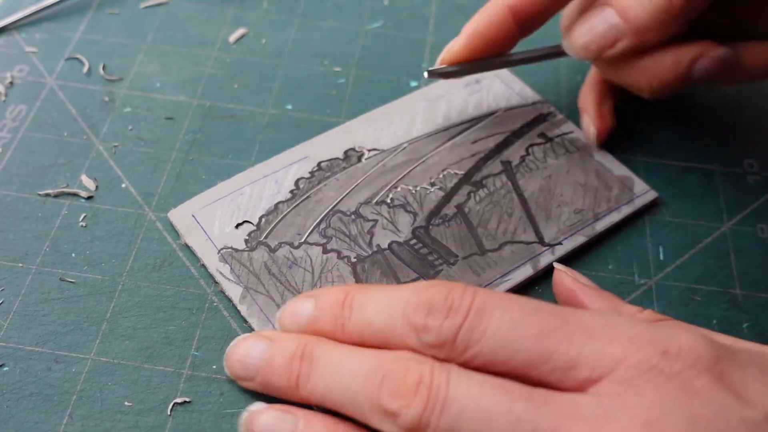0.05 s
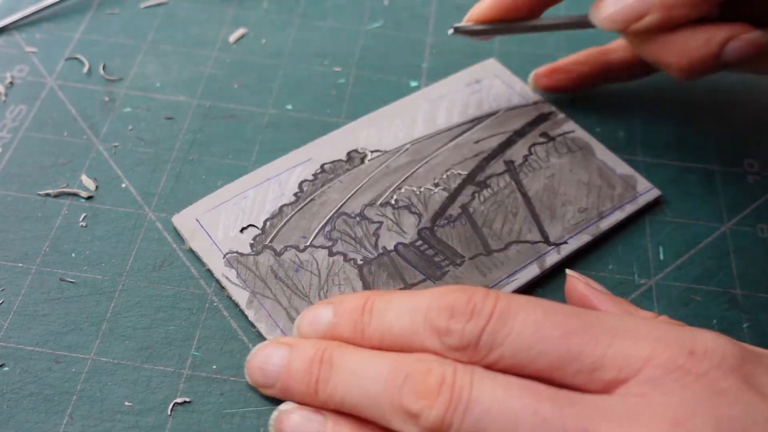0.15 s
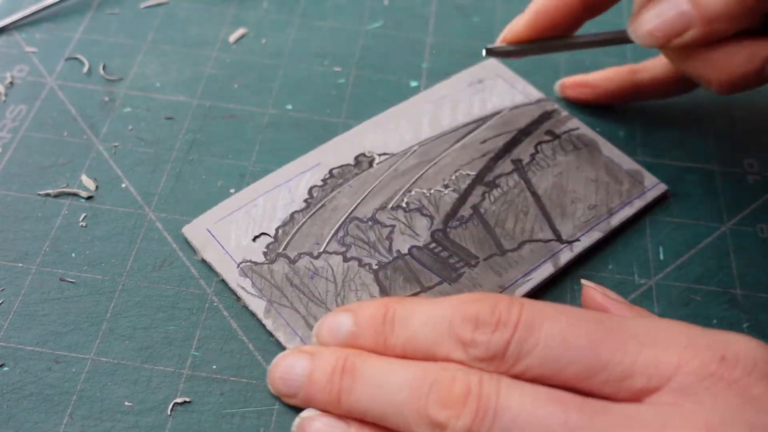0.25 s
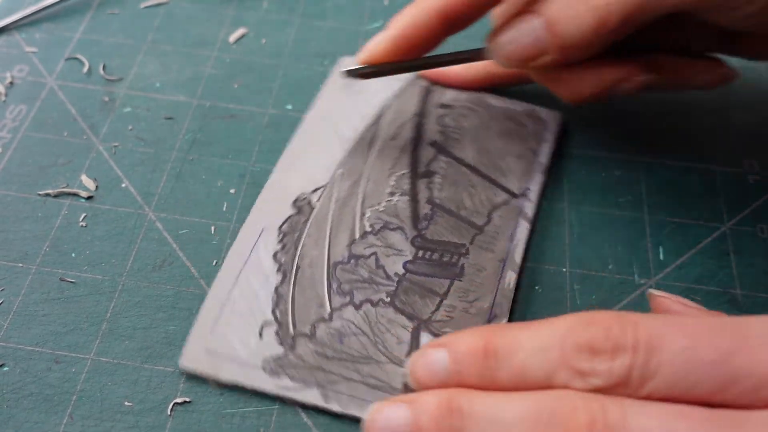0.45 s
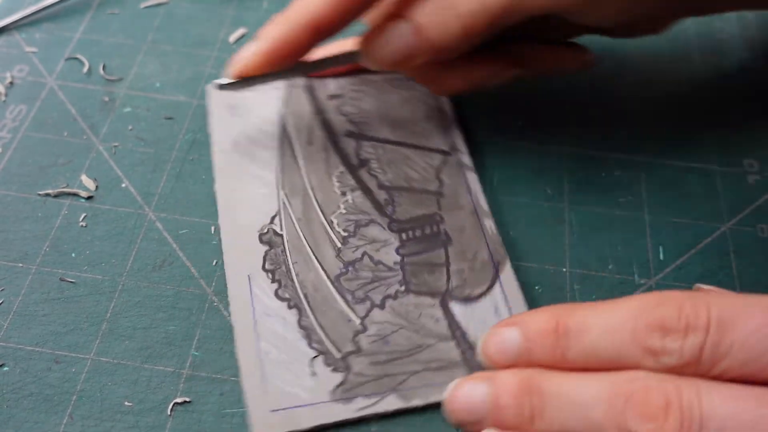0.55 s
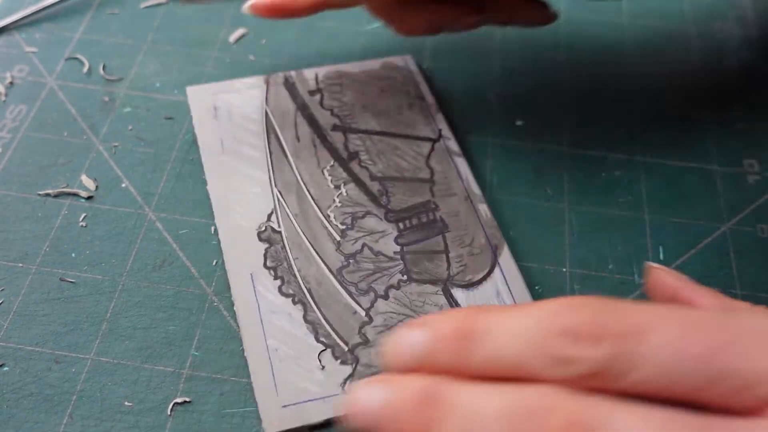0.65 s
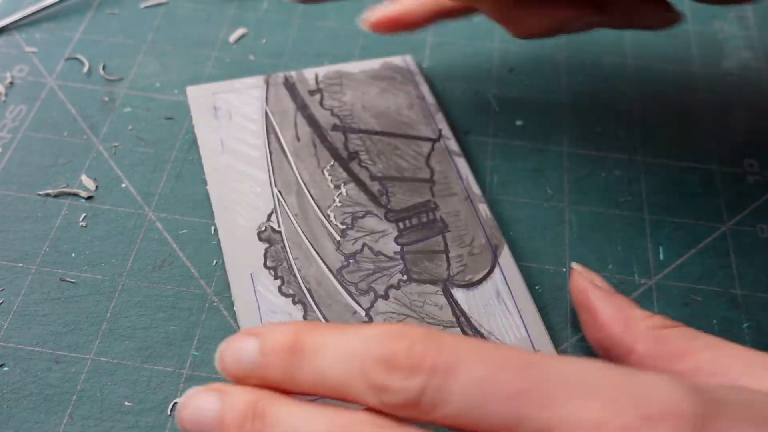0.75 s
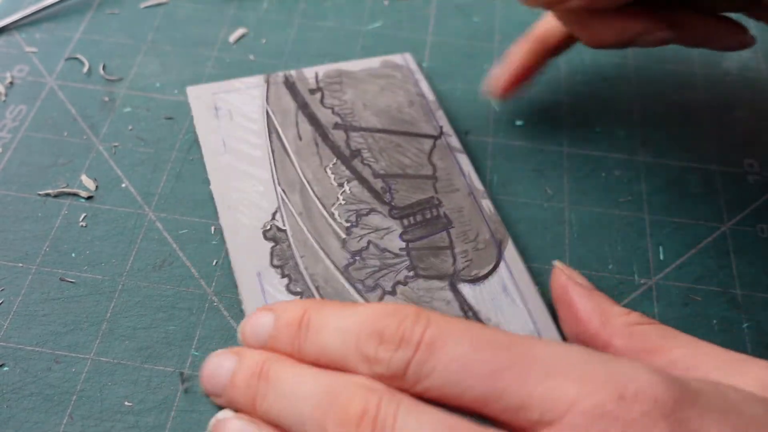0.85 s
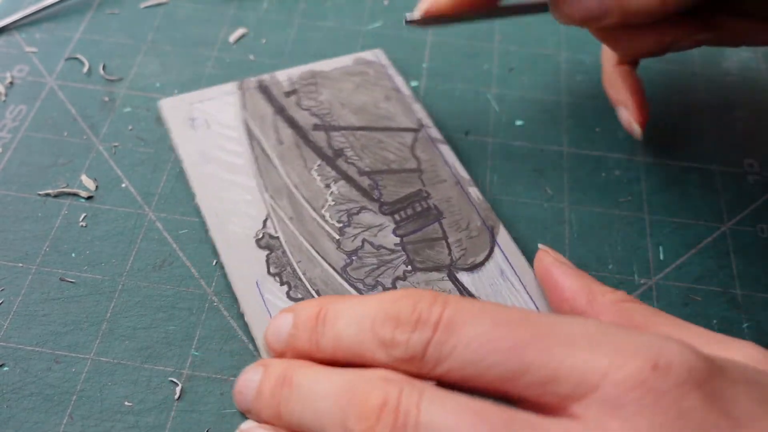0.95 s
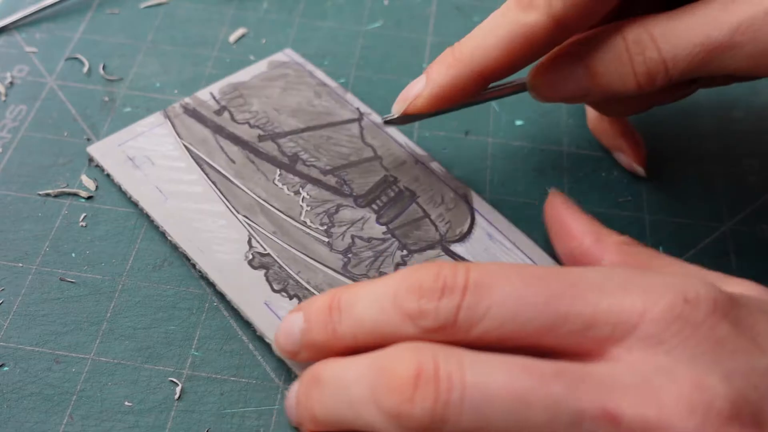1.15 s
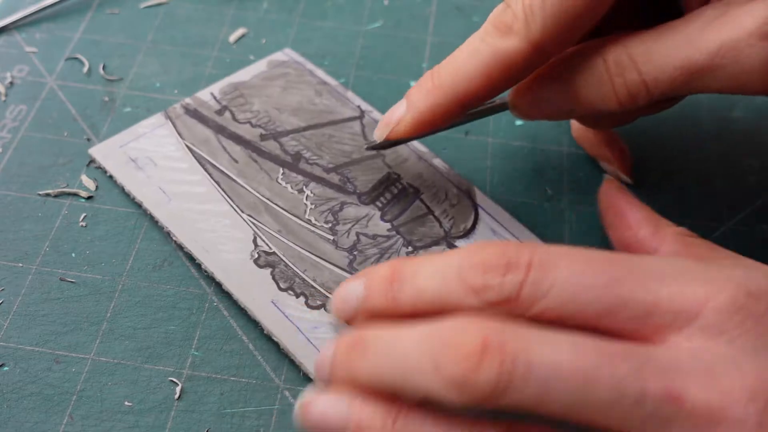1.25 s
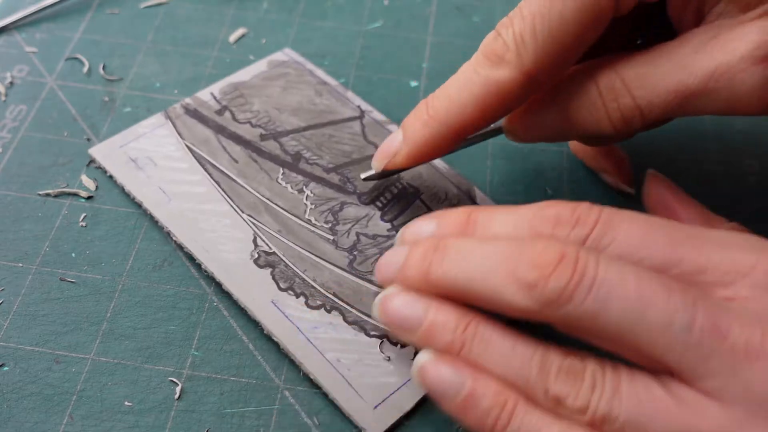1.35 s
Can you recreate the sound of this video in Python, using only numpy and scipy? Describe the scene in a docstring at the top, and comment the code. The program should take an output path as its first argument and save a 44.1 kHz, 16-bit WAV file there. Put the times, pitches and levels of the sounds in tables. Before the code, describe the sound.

A small carving block scrapes on a cutting mat, hollow and hissy. In the first 0.3 seconds a hand tool ticks lightly among short nudges. One longer scrape then swells, peaks with a soft knock near 0.55 seconds and fades by 0.8. More short rubs follow from 0.85 seconds, and the block settles with a few quick soft knocks around 1.2 seconds, over a faint room hush.

```python
"""Over the faint hush of a small room, a hand tool ticks lightly against a small carving block.
A hand turns the block on a cutting mat: short nudges, one long swelling scrape, then a few more nudges.
The rubbing is a stream of tiny slips that make the block ring hollowly and the mat hiss, with brief zips.
The block knocks softly at the height of the scrape, and a few more times as it is set in place."""
import sys
import numpy as np
from scipy import signal
from scipy.fft import rfft, irfft, next_fast_len
from scipy.io import wavfile

SR = 44100
rng = np.random.default_rng(int(sys.argv[2]) if len(sys.argv) > 2 else 0)


def dump(signal):
    """Clip the signal to [-1, 1] and save it as 16-bit WAV at the path in sys.argv[1]."""
    limited = np.clip(np.atleast_2d(signal).T, -1, 1)
    pcm = np.round(limited * 32767).astype(np.int16)
    wavfile.write(sys.argv[1], SR, pcm)


N = 61739

# A colour says how strong each frequency is next to the others.
# colour of the room's hush: f/Hz, level/dB
HUSH_COLOUR = [(25, -40), (60, -20), (130, -14), (260, -5), (500, -1), (700, 0.5), (880, 5.5), (1200, -1),
               (1550, 4), (2100, 3.5), (3200, -0.5), (6000, -2.5), (10000, -7), (15500, -8)]
# sharp ticks of tool and block edge: t/s, level/dB, treble tilt/(dB per octave)
TICK_HITS = [(.0073, -50.5, 5.5), (0.0397, -32, -1), (0.221, -42, 14), (0.2216, -34, -3),
             (0.2622, -41.5, -4), (0.2755, -46, -7), (0.349, -42, -2.5), (0.5654, -36, -3.5)]
# colour of a tick: f/Hz, level/dB
TICK_COLOUR = [(40, -32), (200, -27.5), (500, -10.5), (750, -27.5), (1180, 2), (1400, -13), (1900, 1),
               (2600, -4), (3200, -12), (4000, -3.5), (5100, -4.5), (6800, -12.5), (10800, -11),
               (12800, -25), (14500, -16), (15800, -32)]
# short pushes: peak t/s, rise/s, fall/s, ring f/Hz, then level/dB of hollow ring, upper ring, rasp, hiss
SHORT_NUDGES = [(.132, 0.028, 0.038, 1160, -71.5, -67.5, -67.5, -61.5),
                (.162, 0.015, 0.066, 1210, -74, -70, -65.5, -61.5),
                (.21, 0.032, 0.12, 1247, -61.5, -62.5, -60, -62),
                (0.265, 0.0097, 0.035, 1280, -55.5, -52.5, -54.5, -64.5),
                (.855, 0.027, 0.066, 1340, -63, -72.5, -67, -67.5),
                (0.919, 0.03, 0.038, 1206, -56, -63.5, -59.5, -63),
                (1.04, 0.1, 0.12, 1226, -59.5, -63.5, -59, -59.5),
                (1.129, 0.005, 0.046, 1220, -58, -80, -65, -67.5),
                (1.204, 0.068, 0.036, 1150, -56, -69, -63, -69),
                (1.233, 0.043, 0.019, 1240, -55, -67, -60.5, -68.5),
                (1.27, 0.047, 0.055, 1050, -69, -72, -73.5, -75.5)]
# the long turn: t/s, then level/dB of hollow ring, upper ring, rasp, hiss
LONG_TURN = [(0.3, -60, -64, -66.5, -69), (0.334, -55, -61.5, -61.5, -63.5),
             (0.344, -53, -58.5, -52.5, -61), (0.388, -51, -58, -54.5, -55.5),
             (0.483, -49.5, -49, -46.5, -46.5), (0.557, -47, -49, -47.5, -44.5),
             (0.564, -47, -48.5, -45, -45.5), (0.61, -53, -50.5, -50.5, -49),
             (0.638, -51.5, -55.5, -56.5, -57), (0.684, -71.5, -64, -66.5, -69.5),
             (0.752, -73, -71.5, -75, -78.5), (0.812, -75.5, -75, -78.5, -86), (0.83, -88, -73.5, -84, -90)]
# colours of those four parts of the rubbing: f/Hz, level/dB
HOLLOW_COLOUR = [(30, -72), (120, -57), (260, -38.5), (500, -24.5), (680, -31), (830, -23), (950, -15),
                 (1120, -5), (1220, 1.5), (1340, -5), (1480, -8.5), (1650, -12.5), (1900, -32), (4000, -46)]
UPPER_COLOUR = [(300, -71), (520, -24.5), (750, -26.5), (1350, -18.5), (1640, -1.5), (1780, -5.5),
                (1950, -0.5), (2150, -4.5), (2500, -17.5), (5000, -32.5)]
RASP_COLOUR = [(300, -61), (1500, -30), (2150, -11.5), (2400, 0), (2660, 0), (3000, -0.5), (3400, -4),
               (3780, -1.5), (4150, -5), (4500, -7), (5000, -8), (6200, -22.5), (15000, -41)]
HISS_COLOUR = [(1000, -49), (3500, -19), (5300, -2), (6300, 0), (7000, -1), (7800, -0.5), (9200, -2.5),
               (10400, -3), (12500, -5.5), (15500, -7.5)]
# the block's narrow resonances, which shape all rubbing: f/Hz, width/Hz, boost/dB
BLOCK_RESONANCES = [(823, 14, 5), (1234, 23, 2.5), (1654, 30, 1), (1925, 32, 1), (2330, 31, 2),
                    (2400, 13, 4.5), (2560, 52, 3.5), (2665, 76, 3), (3840, 220, -1), (4370, 230, 2)]
# stereo width of the rubbing: f/Hz, side level/dB compared with the middle
RUB_WIDTH = [(60, -20), (250, -12), (600, -2.5), (1200, -14.5), (2500, -11.5), (5000, -13), (14000, -11)]
# low drag on the mat, strongest as the turn slows: t/s, level/dB
MAT_DRAG = [(.2, -87), (.265, -72), (.38, -71.5), (.5, -73), (.575, -58), (.63, -63.5), (.7, -75),
            (.78, -77.5), (.86, -100)]
# colour of that drag: f/Hz, level/dB
MAT_COLOUR = [(60, -44), (160, -20.5), (270, -9), (400, -25), (500, -5.5), (700, -0.5), (850, 8.5),
              (1000, -5), (1400, -24), (5000, -53)]
# brief resonances in the hiss: peak t/s, half length/s, f/Hz, half width/Hz, level/dB
HISS_ZIPS = [(0.157, .022, 10250, 600, -64.5), (0.155, 0.015, 6100, 450, -77),
             (.2153, .0022, 4430, 2200, -52), (0.358, 0.1, 7940, 700, -67), (0.408, 0.12, 3820, 400, -62),
             (.46, 0.07, 7750, 700, -62.5), (0.564, 0.084, 6400, 1200, -52.5),
             (0.568, 0.017, 3760, 705, -47), (0.895, .06, 7700, 1000, -73.5),
             (1.026, 0.043, 9300, 805, -65.5), (1.03, 0.13, 4730, 704, -67), (1.102, 0.1, 8550, 790, -72)]
# soft knocks: peak t/s, level/dB, f/Hz, contact/s, overtone boost/dB,
# then the thud's level/dB, f/Hz and time to fade by 60 dB/s
BLOCK_KNOCKS = [(0.567, -34, 1220, 0.003, -12, -46, 560, .045),
                (1.2095, -51, 1400, 0.0018, 5, -80, 300, .01),
                (1.2155, -34, 1160, 0.0016, -11, -53.5, 290, .02),
                (1.228, -47, 1300, 0.0013, 1, -80, 300, .01), (1.2316, -44, 1150, 0.001, 7, -74, 300, .01),
                (1.2367, -35.8, 1160, 0.0023, -10, -66, 270, .07),
                (1.24, -44, 1350, 0.0011, 1, -78, 340, .01), (1.2445, -46, 1170, 0.0015, -4, -80, 340, .01)]
# overtones of the knocked block: f/Hz, relative level/dB
BLOCK_OVERTONES = [(1150, -9), (1550, -5), (2130, -11.5), (2480, -12), (3220, -15.5), (3680, -15.5)]
# where the block and tool are heard: t/s, left minus right level/dB
BALANCE = [(.1, -1), (.4, -0.8), (.6, 0.2), (.8, -4), (.95, 1.4), (1.3, 1)]
# the room's echo: f/Hz, time to fade by 60 dB/s
ECHO_FADE = [(200, 0.53), (1500, 0.34), (5000, 0.69), (14000, 0.17)]

TIME = np.arange(N) / SR


def amp(db):
    """Turn decibels into a gain."""
    return 10 ** (np.asarray(db) / 20)


def unit(x):
    """Scale a sound to an average strength (rms) of 1."""
    return x / np.sqrt(np.mean(x ** 2) + 1e-20)


def along(points, hz):
    """Read between (f/Hz, value) points on a log frequency scale."""
    f, values = np.transpose(points)
    return np.interp(np.log(hz + 1), np.log(f + 1), values)


def curves(rows):
    """Give each column after the time one value per sample."""
    times, *columns = np.transpose(rows)
    return [np.interp(TIME, times, column) for column in columns]


def filtered(x, response):
    """Scale each frequency in x by the gain response(hz)."""
    size = next_fast_len(N + SR // 2)
    return irfft(rfft(x, size) * response(np.fft.rfftfreq(size, 1 / SR)), size)[..., :N]


def room_hush(level_db=-70, side_db=-8):
    """The steady, soft noise of the room."""
    noise = filtered(rng.standard_normal((2, N)), lambda hz: amp(along(HUSH_COLOUR, hz)))
    mid, side = noise * amp([[0], [side_db]])
    return amp(level_db) * unit(np.array([mid + side, mid - side]))


def tick_ring(tilt_db, size=4096, travel_s=0.00067):
    """One tick's ring. High notes cross the block first; a 1 kHz bending wave takes travel_s."""
    hz = np.fft.rfftfreq(size, 1 / SR)
    treble_octaves = np.log2(np.maximum(hz, 1200) / 1200)
    log_gain = np.log(amp(along(TICK_COLOUR, hz) + tilt_db * treble_octaves))
    fold = np.r_[1, np.full(size // 2 - 1, 2), np.zeros(size // 2)]  # puts the ring after the hit
    phase_lag = 4 * np.pi * travel_s * np.sqrt(1000 * hz)
    ring = irfft(np.exp(rfft(irfft(log_gain) * fold) - 1j * phase_lag))
    return ring / np.abs(ring).max()


def tool_ticks(grit_db=-9, grit_fade_s=0.024):
    """Hard little hits, each followed by gritty smaller contacts that die quickly."""
    out, t = np.zeros(N + SR), np.arange(SR // 20) / SR
    for start, db, tilt_db in TICK_HITS:
        grit = rng.standard_normal(len(t)) * amp(-60 * t / grit_fade_s)
        force = (t == 0) + amp(grit_db) * grit / np.linalg.norm(grit)
        ring = signal.fftconvolve(tick_ring(tilt_db), force)
        out[round(start * SR):][:len(ring)] += amp(db) * ring
    return out[:N]


def rubbing(colour, pitch_ratio=1, slips_per_s=5000, spread_db=2.5, smooth_share=0.57):
    """Tiny uneven slips over a smooth rush, shaped by a colour and the block's resonances."""
    slips = (rng.random((2, N)) < slips_per_s / SR) * rng.standard_normal((2, N))
    slips *= amp(spread_db * rng.standard_normal((2, N)))
    rush = rng.standard_normal((2, N))
    force = np.sqrt(1 - smooth_share) * unit(slips) + np.sqrt(smooth_share) * rush

    def response(hz):
        boost_db = sum(db / (1 + (2 * (hz - f) / width) ** 2) for f, width, db in BLOCK_RESONANCES)
        gain = amp(along(colour, hz / pitch_ratio) + boost_db)
        return np.array([gain, gain * amp(along(RUB_WIDTH, hz))])

    mid, side = filtered(force, response)
    return unit(np.array([mid + side, mid - side]))


def sliding_block(edge_fade_s=0.043, hollow_hz=1220):
    """Sliding stirs two rings, a rasp and a hiss over a low drag; each nudge rings at its own pitch."""
    inside_turn_s = np.minimum(TIME - LONG_TURN[0][0], LONG_TURN[-1][0] - TIME)
    turning = np.clip(inside_turn_s / edge_fade_s + 1, 0, 1)
    gains = amp(curves(LONG_TURN)) * turning
    out = gains[0] * rubbing(HOLLOW_COLOUR) + amp(curves(MAT_DRAG)) * rubbing(MAT_COLOUR)
    powers = gains[1:] ** 2  # upper ring, rasp and hiss
    for peak, rise, fall, hz, hollow_db, *upper_db in SHORT_NUDGES:
        swell = np.exp(-2 * ((TIME - peak) / np.where(TIME < peak, rise, fall)) ** 2)
        out += amp(hollow_db) * swell * rubbing(HOLLOW_COLOUR, hz / hollow_hz)
        powers += (amp(upper_db)[:, None] * swell) ** 2
    for power, colour in zip(powers, (UPPER_COLOUR, RASP_COLOUR, HISS_COLOUR)):
        out += np.sqrt(power) * rubbing(colour)
    return out


def edge_zips(edge_db=-17.5):
    """As the block's edge changes its angle on the mat, the hiss briefly gathers around one pitch."""
    out = np.zeros((2, N))
    for peak, length, hz, width, db in HISS_ZIPS:
        colour = [(hz / 4, -80), (hz - width, edge_db), (hz, 0), (hz + width, edge_db), (hz * 2, -80)]
        swell = np.exp(-2 * ((TIME - peak) / length) ** 2)
        out += amp(db) * swell * rubbing(colour)
    return out


def block_knocks():
    """The block rocks into place: each cushioned contact rings it briefly and thuds in the mat."""
    out = np.zeros(N)
    for peak, db, pitch_hz, contact, boost_db, thud_db, thud_hz, thud_fade_s in BLOCK_KNOCKS:
        swell = np.exp(-((TIME - peak) / contact) ** 2)
        ring = np.sin(2 * np.pi * pitch_hz * (TIME - peak))
        for hz, overtone_db in BLOCK_OVERTONES:
            ring += amp(overtone_db + boost_db) * np.sin(2 * np.pi * (hz * TIME + rng.random()))
        age = np.maximum(TIME - peak + contact, 0)
        onset = (1 - np.exp(-(age / contact) ** 2)) ** 2
        thud = onset * amp(-60 * age / thud_fade_s) * np.sin(2 * np.pi * thud_hz * age)
        out += amp(db) * swell * ring + amp(thud_db) * thud
    return out


def room_echo(x):
    """The room adds a short stereo tail; the highest treble dies first."""
    hz, t, noise = signal.stft(rng.standard_normal((2, SR // 2)), SR, nperseg=256)
    fade = amp(-60 * t / along(ECHO_FADE, hz)[:, None])
    tail = signal.istft(noise * fade, SR, nperseg=256)[1]
    return signal.fftconvolve(x[None], tail / np.linalg.norm(tail[0]), axes=1)[:, :N]


def scene(slide_echo_db=-14, hit_echo_db=-11):
    """Block and tool stay near the middle and end slightly left, with a little echo and hush."""
    slide = sliding_block() + edge_zips()
    hits = tool_ticks() + block_knocks()
    balance_db, = curves(BALANCE)
    direct = (slide + hits) * amp([balance_db / 2, -balance_db / 2])
    echo = amp(slide_echo_db) * room_echo(slide.mean(axis=0)) + amp(hit_echo_db) * room_echo(hits)
    return direct + echo + room_hush()


def record(dry):
    """Cut away everything above 15900 Hz."""
    return filtered(dry, lambda hz: hz < 15900)


dry = scene()
out = record(dry)
dump(out)
```